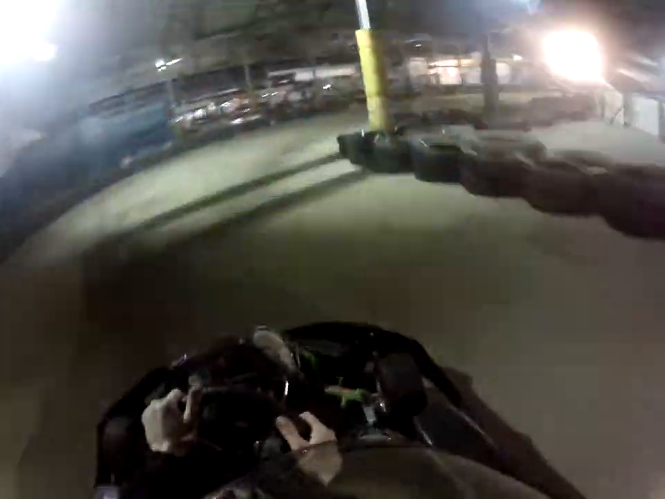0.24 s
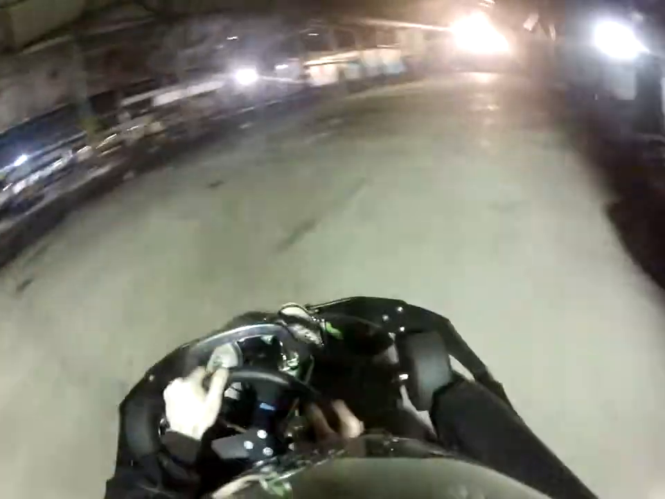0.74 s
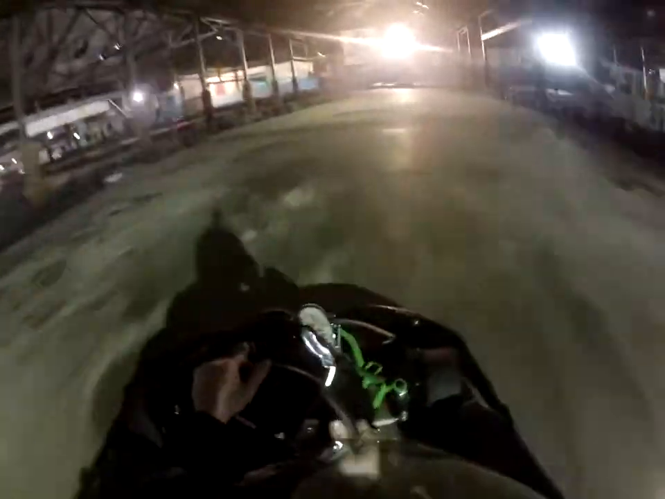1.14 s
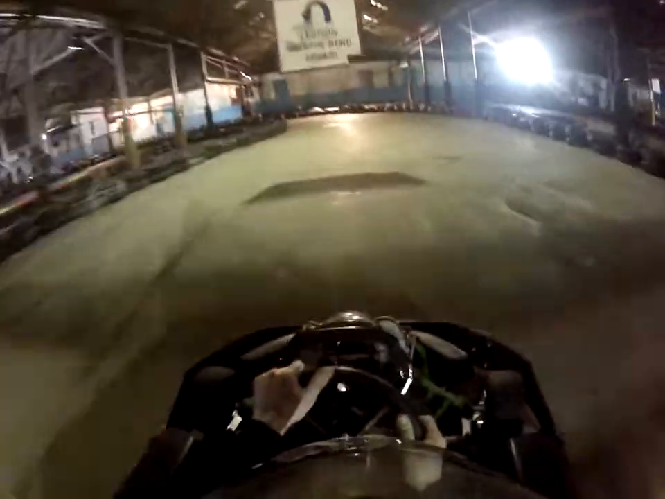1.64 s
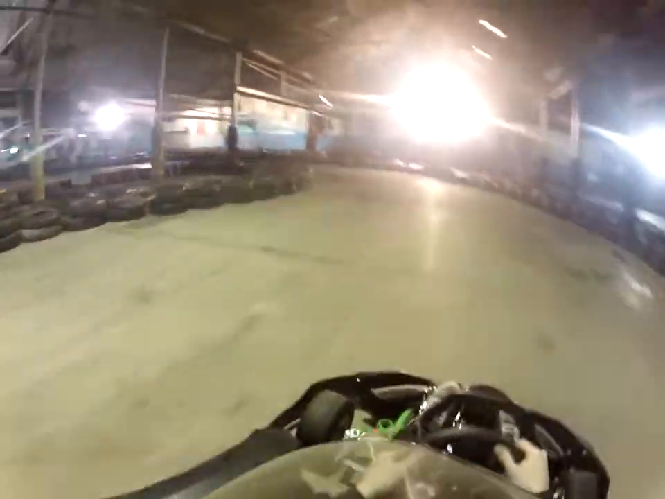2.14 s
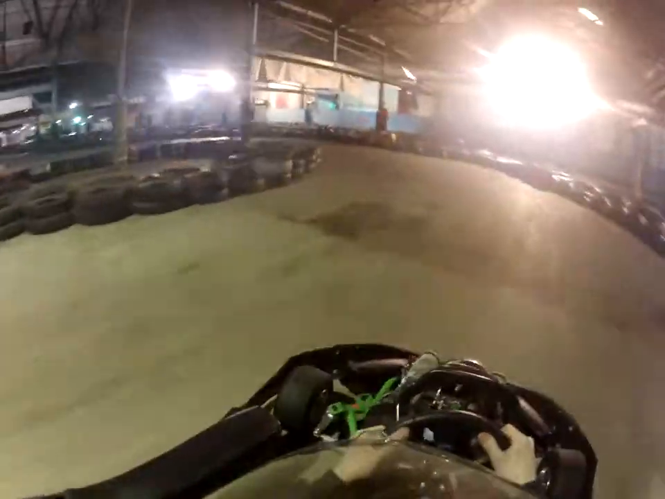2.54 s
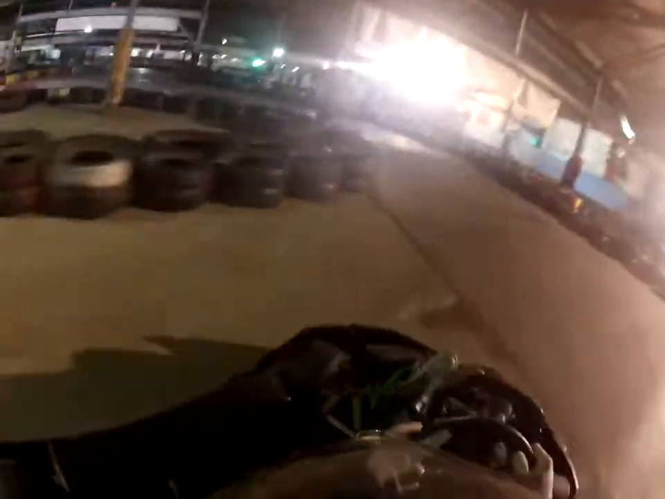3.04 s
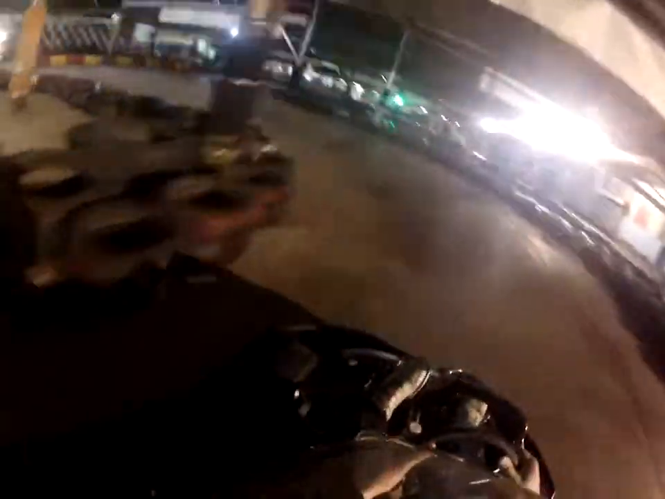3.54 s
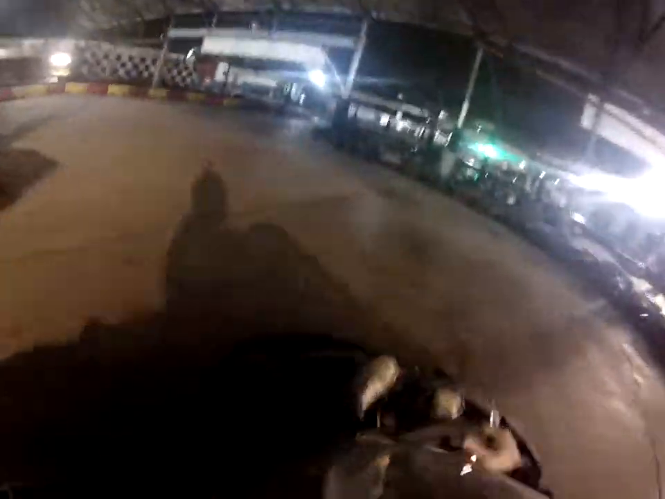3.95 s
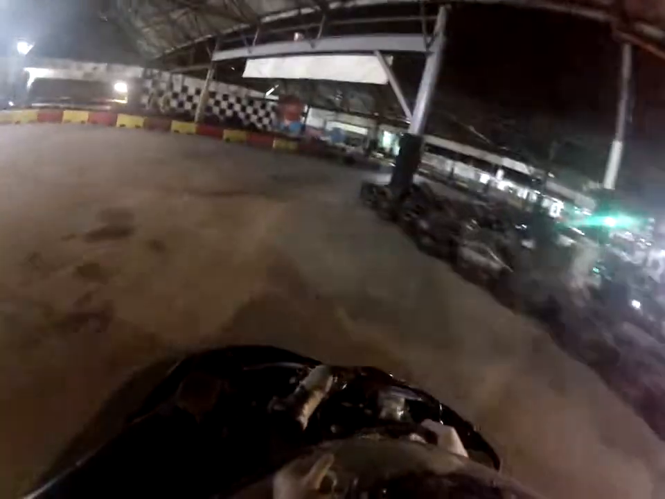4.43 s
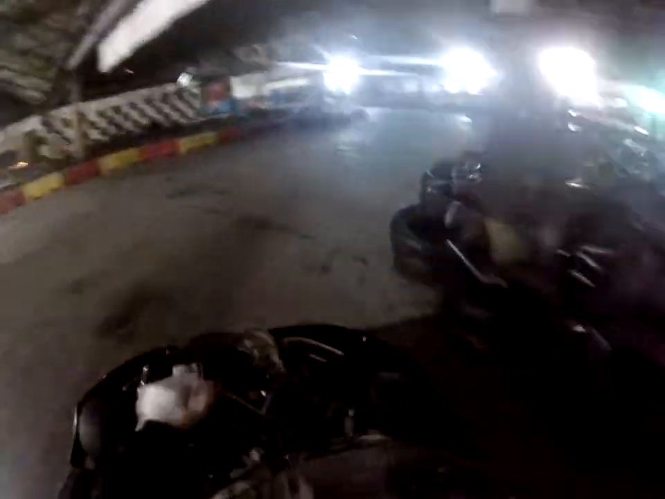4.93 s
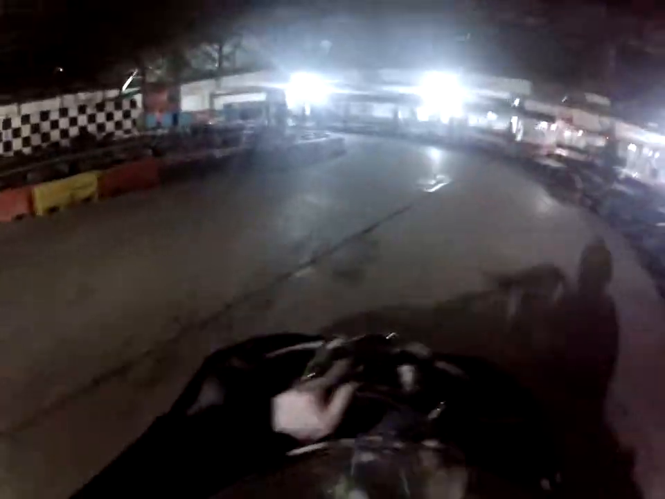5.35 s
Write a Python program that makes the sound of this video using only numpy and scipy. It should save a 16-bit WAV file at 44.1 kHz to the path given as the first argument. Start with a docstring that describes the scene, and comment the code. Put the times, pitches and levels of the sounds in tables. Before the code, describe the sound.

A lapping single-cylinder kart from the driver's head: buzzing exhaust, chain and valve clatter, tyre rush and heavy low wind. It runs fast for about a second and a half, slackens into the bend, blips, lifts again, then pulls steadily with louder ringing clatter and faint chirps. The large hall adds a faint late wash; the camera sounds coarse.

```python
"""In a hall, on a lapping four-stroke single-cylinder go-kart; microphone in a camera on the helmet.
Close by, the exhaust drones down the straight, sags into a bend and pulls again: a sum of firing orders.
Shaped noise makes the gas hiss, chain and valve chatter, tyre rush, hollow boom and bodywork rattles;
short tones make the tyre chirps. Wind rumbles and buffets; coarse sampling adds a gritty fizz."""
import sys
import numpy as np
from scipy import signal
from scipy.fft import rfft, irfft, next_fast_len
from scipy.io import wavfile
from scipy.ndimage import uniform_filter1d

SR = 44100
rng = np.random.default_rng(int(sys.argv[2]) if len(sys.argv) > 2 else 0)


def unload_audio(sound):
    """Save the sound as a 16-bit wav file, at the path given as the first command line argument."""
    columns = np.transpose(np.atleast_2d(sound))
    # keep every value between -1 and 1, then stretch to whole-number steps
    steps = np.round(np.clip(columns, -1, 1) * 32767)
    wavfile.write(sys.argv[1], SR, steps.astype(np.int16))


N = 246519
TIME = np.arange(N) / SR  # s

# Driving: engine speed, wavering as the wheels ride the bumps: t/s, firing rate f/Hz
ENGINE_SPEED = [(0.0, 41.34), (0.61, 42.1), (0.68, 43.36), (0.86, 41.76), (0.96, 43.2), (1.06, 41.73),
                (1.23, 41.54), (1.31, 42.84), (1.38, 41.6), (1.77, 40.28), (2.01, 37.96), (2.12, 36.37),
                (2.21, 34.36), (2.52, 33.75), (2.6, 32.9), (2.79, 33.66), (2.91, 34.22), (3.19, 32.28),
                (3.39, 33.88), (3.52, 34.12), (3.71, 33.65), (3.85, 32.24), (3.95, 34.65), (4.05, 33.27),
                (4.55, 33.73), (4.64, 34.95), (4.89, 33.2), (5.06, 36.42), (5.21, 34.78), (5.36, 35.3),
                (5.48, 34.2), (5.59, 34.88)]
# Throttle held down: from t/s, until t/s
THROTTLE_PULLS = [(.1, 1.53), (2.57, 2.92), (3.17, 5.7)]
OPEN_S, CLOSE_S = 0.034, 0.087  # time constants of taking up and shedding load
CORNER_HZ, STRAIGHT_HZ = 33.97, 42.1  # firing rates in the bends and on the straight

# Each layer's level law: level/dB pulling at corner speed, change/dB at straight speed,
# change/dB off the throttle
WIND_LEVEL = (-26.5, 1.9, -7.5)
BOOM_LEVEL = (-35.5, 2.5, -7)
RUSH_LEVEL = (-29, 4.47, -0.37)
CASING_LEVEL = (-29, 1.22, -1.3)
GAS_LEVEL = (-43.5, 4.7, -3.5)
LOW_ORDERS_LEVEL = (-24.5, 2.6, -.3)
HIGH_ORDERS_LEVEL = (-28.5, 5.4, -8.5)

# Colour of the turbulence at the camera: f/Hz, relative level/dB
WIND_COLOUR = [(12, -26), (24, -1.5), (36, 1.5), (50, -0.5), (75, -9.5), (120, -23.5), (300, -47),
               (900, -62)]
# Colour of the eddies torn off in a buffet: f/Hz, relative level/dB
EDDY_COLOUR = [(35, -16), (68, 1), (110, -8.5), (200, -8.5), (300, -23), (900, -64)]
# Buffets on the camera: onset t/s, relative level/dB
WIND_BUFFETS = [(0.456, -14), (0.627, -5), (0.714, -2.5), (.881, -11), (1.017, -7), (1.25, -9),
                (1.342, -0.5), (1.443, -3), (1.578, -10), (2.175, -13), (3.03, -13.5), (3.562, -11),
                (3.888, -9), (4.03, -10.5), (4.185, -16), (4.38, -15), (4.505, -11.5), (4.84, -13),
                (5.247, -7.5), (5.515, -6.5)]
BUFFET_HZ = (38.6, 36.7)  # their swing at corner and at straight speed

# Cracks of loose bodywork: onset t/s, relative level/dB, decay by 60 dB t60/s
RATTLE_BLOWS = [(0.927, -5.5, 0.022), (.931, -21, 0.017), (0.985, -1, 0.013), (0.992, -5.5, 0.013),
                (1.001, -6, 0.011), (1.264, -4, 0.0097), (1.268, -4, 0.018), (2.381, -20, 0.04),
                (2.403, -13, 0.037), (2.554, -22, .05), (3.649, -11, 0.01)]
# Colour of the bodywork: f/Hz, relative level/dB
RATTLE_COLOUR = [(500, -22), (1500, -9), (2300, 12), (2900, -27), (3500, 6.5), (4600, -1), (6000, -3.5)]
# Short squeaks, as of tyres slipping: middle t/s, f/Hz, half length t/s, peak level/dB
TYRE_CHIRPS = [(3.562, 2017, 0.0049, -23), (3.651, 2106, 0.003, -13.5), (3.681, 1990, 0.0087, -20.5),
               (3.719, 2000, 0.0059, -18), (5.081, 1673, 0.0041, -19.5), (5.108, 1629, 0.0041, -14),
               (5.162, 2312, .004, -16.5), (5.183, 2220, 0.0072, -22)]

# Hollow resonance of the space between helmet and camera: f/Hz, width f/Hz, relative level/dB
HELMET_CAVITY = [(182, 31, 0)]

# Broad colour of chain and tyres: f/Hz, relative level/dB
RUSH_COLOUR = [(60, -1), (150, 12.5), (350, 8.5), (520, -3.5), (700, 2.5), (920, -3), (1080, 5.5),
               (1220, 0.5), (1700, 3), (2800, -3), (3400, -3.5), (4300, -67), (6000, -46)]
# Resonances of engine casing and guards: f/Hz, width f/Hz, relative level/dB
CASING_MODES = [(1080, 42, -16), (1414, 11, 1), (1642, 35, -5.5), (2022, 80, 2), (2238, 180, 7),
                (2777, 160, -5), (3360, 115, -8.5), (3612, 100, -1), (4813, 470, -11), (5500, 220, -30)]
# The tight turn loads the chassis and the guards ring louder: from t/s, until t/s, gain level/dB
TURN = (3.17, 4.21, 2.6)
TURN_IN_S, TURN_OUT_S = 0.021, 0.5  # time constants

# Colour of gas leaving the silencer: f/Hz, relative level/dB
GAS_COLOUR = [(200, -11), (400, 0), (560, 0), (700, 6.5), (900, -9), (1400, -11.5), (3000, -10),
              (6000, -53)]
# Exhaust note on the straight: multiple of the firing rate, relative level/dB
NOTE_FAST = [(1, 5), (2, -12), (3, -27), (4, -4.5), (5, -10.5), (6, -4), (7, -14.5), (8, -10.5), (9, -7),
             (10, -5), (11, -16.5), (12, -20), (13, -15), (14, -16.5), (15, -45), (16, -35), (17, -28),
             (18, -46)]
# Exhaust note pulling out of the bend: multiple of the firing rate, relative level/dB
NOTE_SLOW = [(1, 9), (2, -31), (3, -12.5), (4, -11.5), (5, -5), (6, -7), (7, -25.5), (8, -19.5), (9, -7.5),
             (10, -3.5), (11, -7.5), (12, -15.5), (13, -12.5), (14, -13.5), (15, -20.5), (16, -21),
             (17, -18.5), (18, -24.5)]
# Exhaust note coasting: multiple of the firing rate, relative level/dB
NOTE_COAST = [(1, 15), (2, -4.5), (3, -0.5), (4, -0.5), (5, -1), (6, -2), (7, -4), (8, -6.5), (9, -10.5),
              (10, -17), (11, -18), (12, -20.5), (13, -21), (14, -37), (15, -30), (16, -50), (17, -36),
              (18, -46)]
ROUGH_PULLING, ROUGH_IDLING = 0.25, 0.43  # uneven burning, 0-1

# Camera: sampling rate and upper limit of the treble
SAMPLER_HZ, TOP_HZ = 12000, 15280


def undb(db):
    """Decibels to gain."""
    return 10 ** (np.asarray(db) / 20)


def unit(x):
    """Scale to rms 1."""
    return x / np.sqrt(np.mean(x ** 2))


def steady(x):
    """Level x to an rms of 1 over a sliding seventh of a second."""
    return x / np.sqrt(uniform_filter1d(x ** 2, size=SR // 7) + 1e-12)


def curves(table):
    """Each column of a table that starts with t/s, sample by sample."""
    s, *columns = np.transpose(table)
    return [np.interp(TIME, s, c) for c in columns]


def held(start, end, attack_s, release_s):
    """A control that rises towards 1 from start and falls away after end, both exponentially."""
    rise = 1 - np.exp(-np.maximum(TIME - start, 0) / attack_s)
    return rise * np.exp(-np.maximum(TIME - end, 0) / release_s)


def noise():
    """White noise."""
    return rng.standard_normal(N)


def walk(rate_hz):
    """Smooth chance with spread near 1, joining rate_hz random points a second."""
    return 1.2 * np.interp(TIME * rate_hz, np.arange(4096), rng.standard_normal(4096))


def per_cycle(cycles):
    """One random value for every whole turn of a running cycle count."""
    return rng.standard_normal(2048)[np.floor(cycles).astype(int) % 2048]


def filtered(x, response):
    """Pass x through a response given as a function of frequency."""
    size = next_fast_len(N + SR // 2)
    hz = np.maximum(np.arange(size // 2 + 1) * SR / size, 1)
    return irfft(rfft(x, size) * response(hz), size)[:N]


def colour(x, points):
    """Shape x by f/Hz, level/dB points joined on a logarithmic frequency scale."""
    f, db = np.transpose(points)
    return filtered(x, lambda hz: undb(np.interp(np.log(hz), np.log(f), db)))


def ring(x, modes):
    """Let x excite resonances given as f/Hz, width f/Hz, level/dB."""
    def response(hz):
        return sum(undb(db) / (1 + 1j * (hz ** 2 - f ** 2) / (hz * width)) for f, width, db in modes)
    return filtered(x, response)


def driving():
    """Pace (near 0 in the bends, 1 on the straight) and throttle (0-1)."""
    firing_hz, = curves(ENGINE_SPEED)
    pace = (firing_hz - CORNER_HZ) / (STRAIGHT_HZ - CORNER_HZ)
    pulls = sum(held(start, end, OPEN_S, CLOSE_S) for start, end in THROTTLE_PULLS)
    return pace, np.minimum(pulls, 1)


def effort(law, drive):
    """A layer's gain at this pace and throttle."""
    base_db, pace_db, lift_db = law
    pace, throttle = drive
    return undb(base_db + pace_db * pace + lift_db * (1 - throttle))


def hall(x, wet_db=-17, t60=0.99, gap_s=0.04):
    """Roof and walls return the drone late, so it beats against itself as the pitch moves."""
    age = TIME[:SR]
    tail = rng.standard_normal(SR) * undb(-60 * age / t60) * (age > gap_s)
    tail = tail / np.linalg.norm(tail)
    return x + undb(wet_db) * signal.fftconvolve(x, tail)[:N]


def wind(drive, gust_db=2, rise_s=0.0047, fall_s=0.046, buffet_db=2, eddy_db=-15.0):
    """Turbulence rumbles on the camera; each buffet swings it for a few slow cycles and sheds eddies."""
    pace, _ = drive
    rumble = steady(colour(noise(), WIND_COLOUR))
    out = rumble * effort(WIND_LEVEL, drive) * undb(gust_db * walk(12))
    eddies = undb(eddy_db) * steady(colour(noise(), EDDY_COLOUR))
    for s, db in WIND_BUFFETS:
        pace_then = np.interp(s, TIME, pace)
        hz = np.interp(pace_then, [0, 1], BUFFET_HZ)
        swing = np.sin(2 * np.pi * hz * (TIME - s))
        envelope = undb(db + buffet_db) * held(s, s, rise_s, fall_s)
        out = out + envelope * (eddies - swing)
    return out


def rattles(level_db=-5.5):
    """Loose plastic bodywork cracks against the frame: abrupt, fast-decaying bursts of coloured noise."""
    blows = 0
    for s, db, t60 in RATTLE_BLOWS:
        decay_db = -60 * np.maximum(TIME - s, 0) / t60
        blows = blows + undb(db + decay_db) * (TIME >= s)
    return undb(level_db) * blows * unit(colour(noise(), RATTLE_COLOUR))


def chirps(waver=0.21):
    """Tyres slip for an instant on the smooth concrete: brief tones with a wavering phase (waver in rad)."""
    wobble = waver * walk(290)
    out = 0
    for s, hz, half, db in TYRE_CHIRPS:
        envelope = undb(db) * np.exp(-((TIME - s) / half) ** 2)
        out = out + envelope * np.sin(2 * np.pi * hz * TIME + wobble)
    return out


def boom(drive):
    """Chassis shake and air keep a low cavity humming, more so when the engine works hard."""
    return effort(BOOM_LEVEL, drive) * steady(ring(noise(), HELMET_CAVITY))


def machinery(cycles, drive, knock=0.31, turn_knock=0.32, scatter_db=1.03, grain_db=1.0):
    """Valve gear and chain chatter in a surge once a firing; the rush of chain and tyres pulses less."""
    _, throttle = drive
    start, end, turn_db = TURN
    turning = held(start, end, TURN_IN_S, TURN_OUT_S)
    # load hardens the knock, and so does the strain of the turn
    depth = knock * (1 + throttle) / 2 + turn_knock * turning
    surge = np.exp(-depth / 2 * np.cos(2 * np.pi * cycles))
    chatter = surge * undb(scatter_db * per_cycle(cycles) + grain_db * walk(600))
    casing = unit(ring(noise() * chatter, CASING_MODES)) * undb(turn_db * turning)
    rush = unit(colour(noise() * np.sqrt(surge) * undb(2 * walk(300)), RUSH_COLOUR))
    return effort(RUSH_LEVEL, drive) * rush + effort(CASING_LEVEL, drive) * casing


def gas(cycles, drive, puff=0.23):
    """Spent gas hisses in a puff once a firing, most at speed on an open throttle."""
    puffs = noise() * (1 - puff * np.cos(2 * np.pi * cycles))
    return effort(GAS_LEVEL, drive) * unit(colour(puffs, GAS_COLOUR))


def exhaust(cycles, firing_hz, drive, jitter=0.028, flutter=0.9, cavity_db=-3):
    """Firing orders coloured by speed and throttle; uneven burns shake their timing and strength."""
    pace, throttle = drive
    fast = np.clip(pace, 0, 1)
    # it burns least evenly at low revs with the throttle shut
    idling = (1 - throttle) * (1 - fast) ** 2
    rough = ROUGH_PULLING + (ROUGH_IDLING - ROUGH_PULLING) * idling
    turn = 2 * np.pi * (cycles + jitter * rough * walk(40))
    low, high = 0, 0
    notes = zip(NOTE_FAST, NOTE_SLOW, NOTE_COAST)
    for k, ((_, fast_db), (_, slow_db), (_, coast_db)) in enumerate(notes, 1):
        pulling_db = fast * fast_db + (1 - fast) * slow_db
        db = throttle * pulling_db + (1 - throttle) * coast_db
        angle = k * turn + 2 * np.pi * rng.random()
        order = undb(db) * (1 + flutter * rough * walk(30)) * np.cos(angle)
        # orders cross from the low to the high group between 260 and 310 Hz
        upper = np.clip((k * firing_hz - 260) / 50, 0, 1)
        low = low + (1 - upper) * order
        high = high + upper * order
    # the small silencer radiates its lowest orders poorly
    low = colour(low, [(35, -25), (70, -8.5), (130, -8.5)])
    # whichever order passes through the cavity's note swells
    low = low + undb(cavity_db) * ring(low, HELMET_CAVITY)
    return effort(LOW_ORDERS_LEVEL, drive) * steady(low) + effort(HIGH_ORDERS_LEVEL, drive) * steady(high)


def scene():
    """One firing cycle count drives exhaust, gas and machinery; pace and throttle set the steady layers."""
    firing_hz, = curves(ENGINE_SPEED)
    cycles = np.cumsum(firing_hz) / SR
    drive = driving()
    engine = hall(exhaust(cycles, firing_hz, drive)) + gas(cycles, drive)
    engine = engine + boom(drive) + machinery(cycles, drive)
    return (engine + wind(drive) + rattles() + chirps())[None]


def record(dry):
    """The camera samples slowly and holds each value, which mirrors the sound into the treble."""
    slow = signal.resample_poly(dry, SAMPLER_HZ, SR, axis=1)
    stepped = np.repeat(np.clip(slow, -.93, .93), 4, axis=1)
    out = signal.resample_poly(stepped, SR, 4 * SAMPLER_HZ, axis=1)[:, :N]
    # steep low-pass: order 12, 0.2 dB ripple, 80 dB rejection
    return signal.sosfilt(signal.ellip(12, .2, 80, TOP_HZ, fs=SR, output="sos"), out)


dry = scene()
out = record(dry)
unload_audio(out)
```